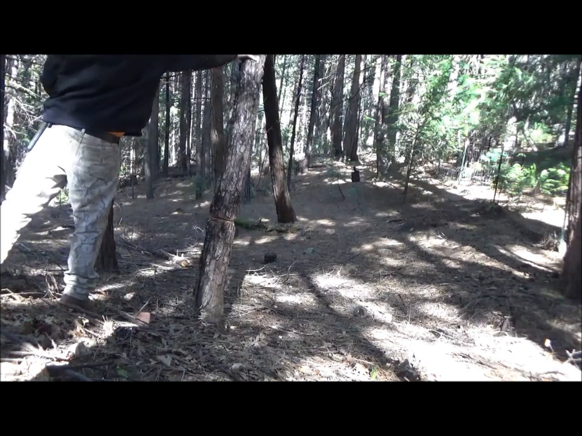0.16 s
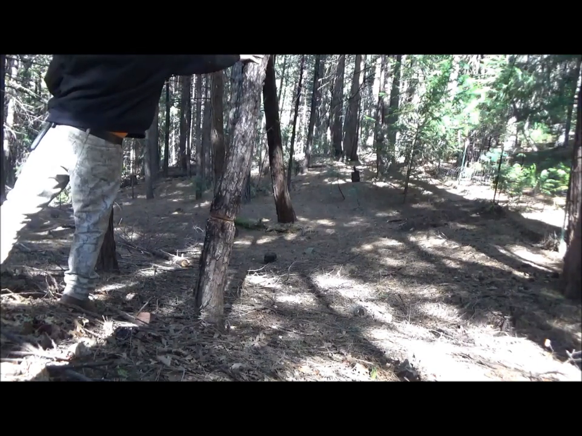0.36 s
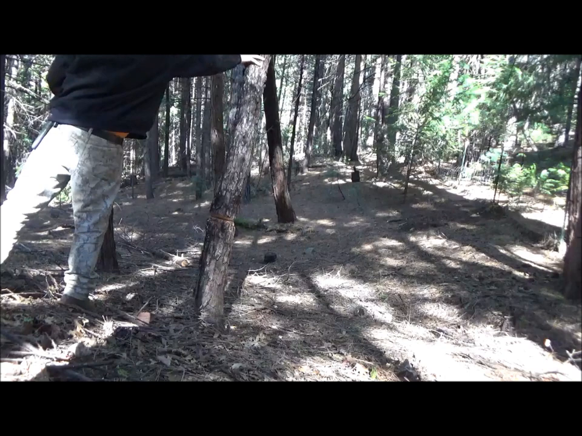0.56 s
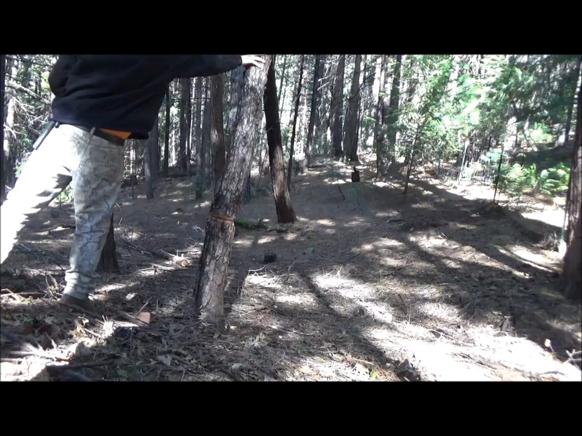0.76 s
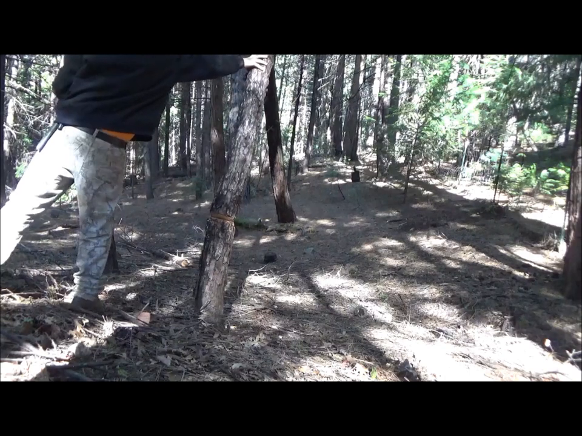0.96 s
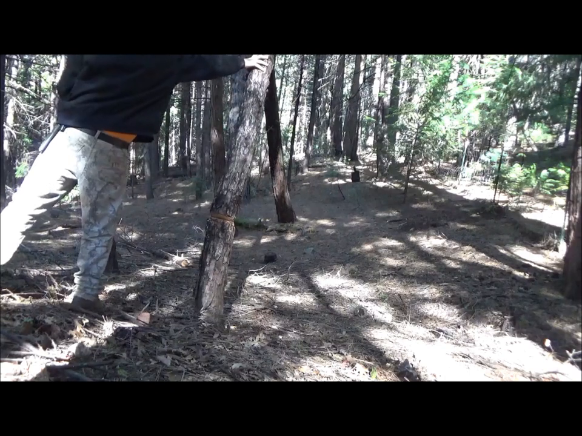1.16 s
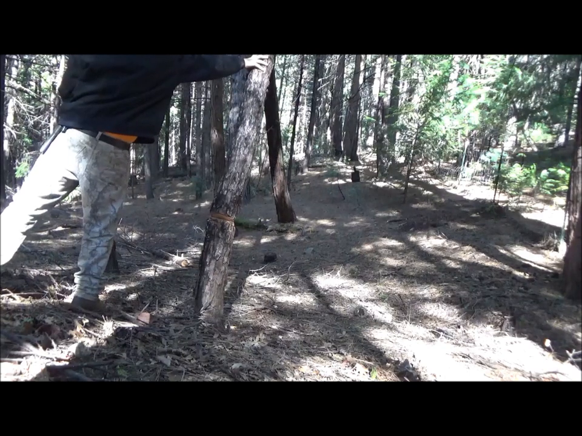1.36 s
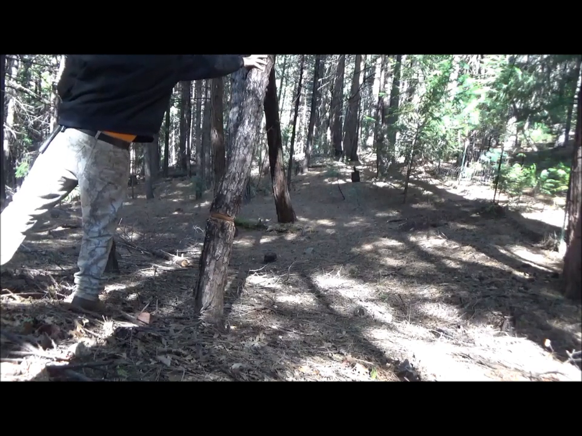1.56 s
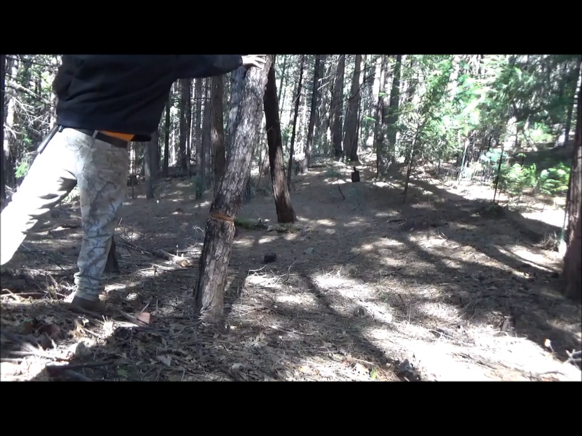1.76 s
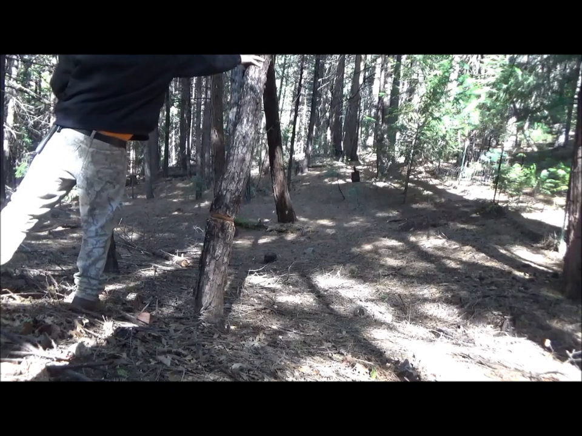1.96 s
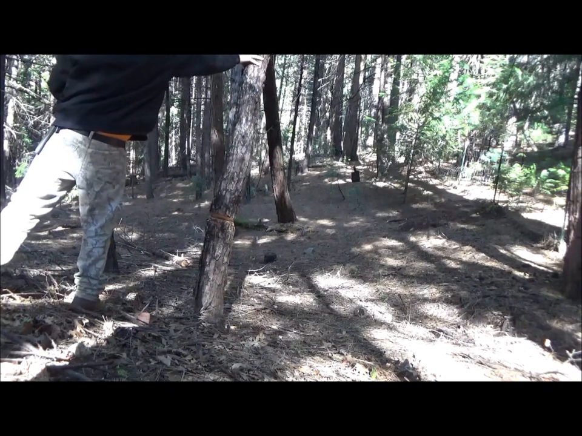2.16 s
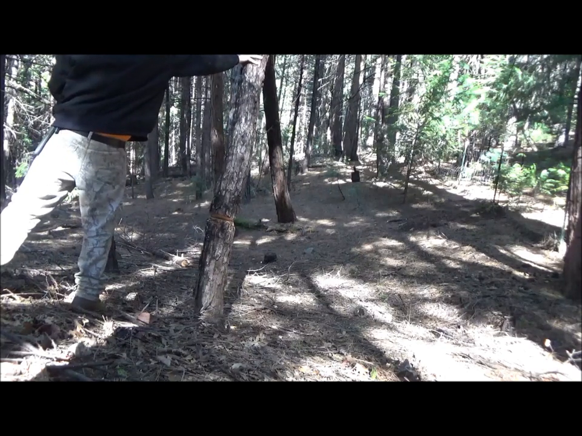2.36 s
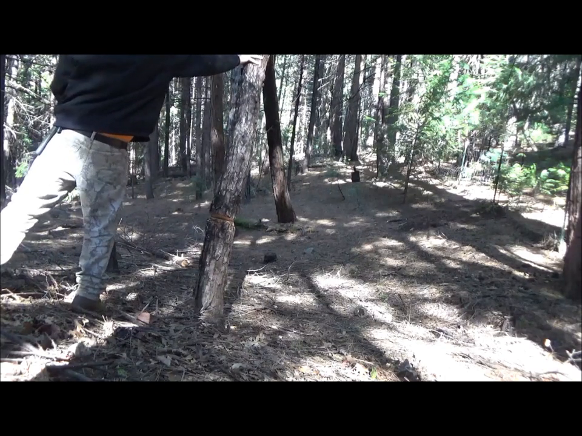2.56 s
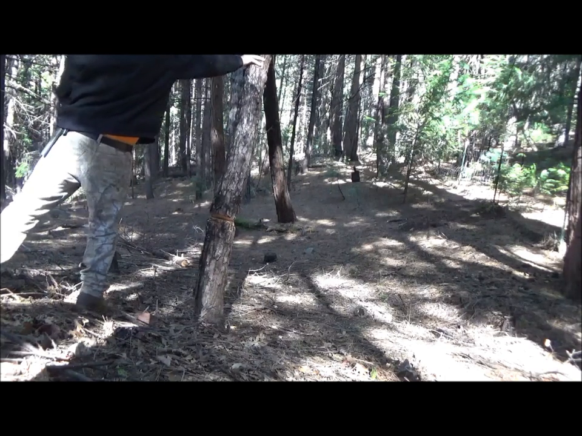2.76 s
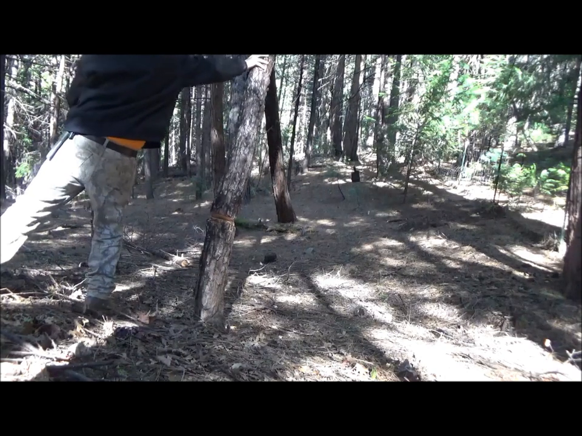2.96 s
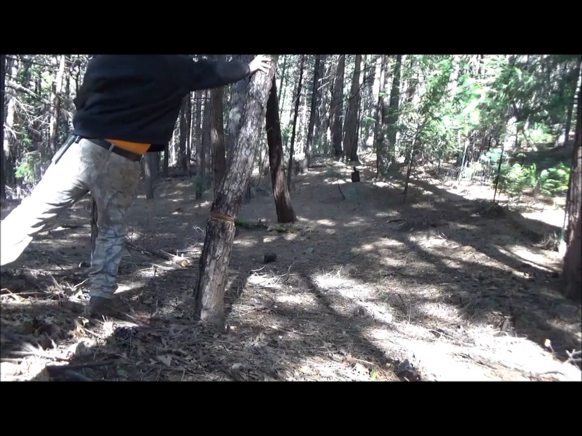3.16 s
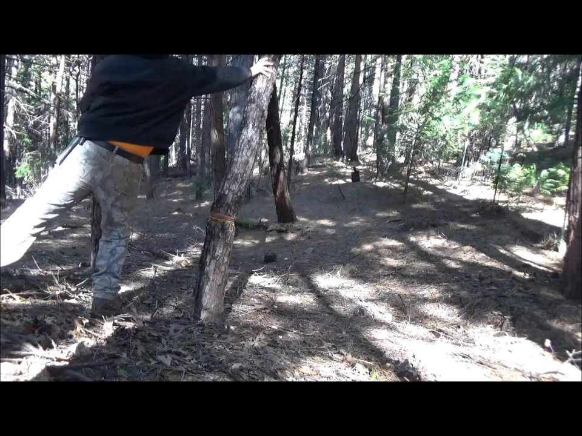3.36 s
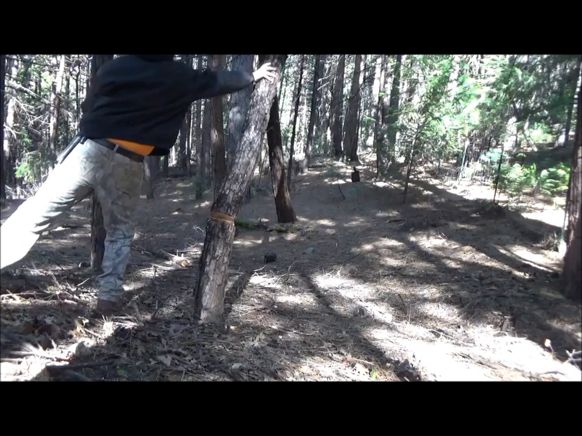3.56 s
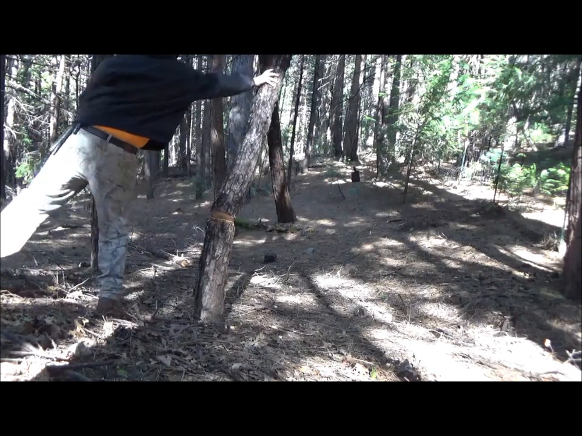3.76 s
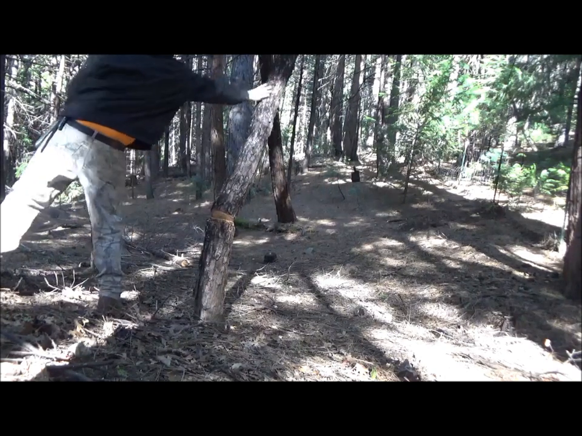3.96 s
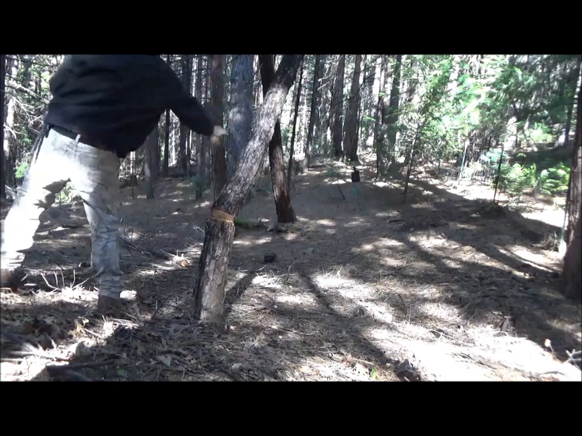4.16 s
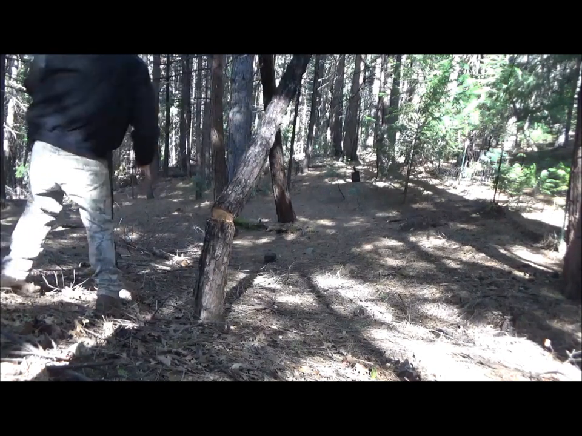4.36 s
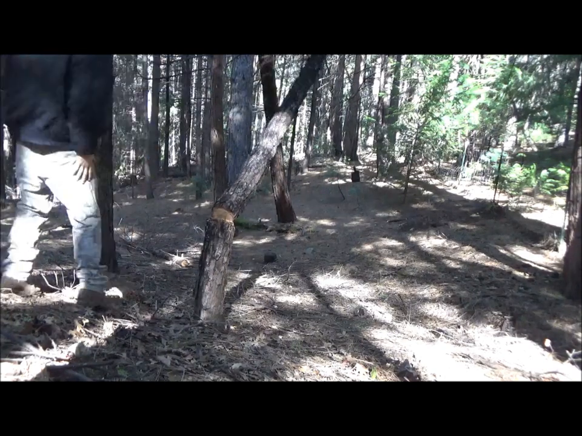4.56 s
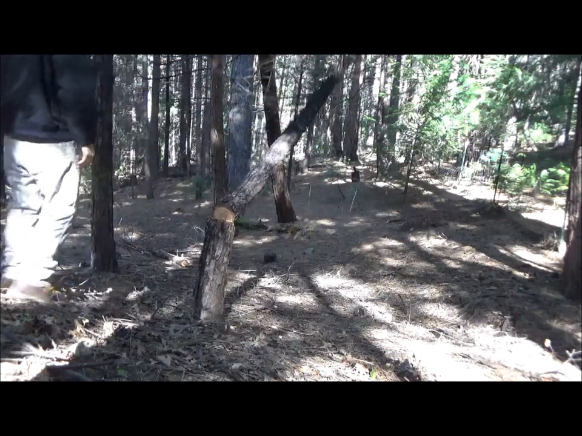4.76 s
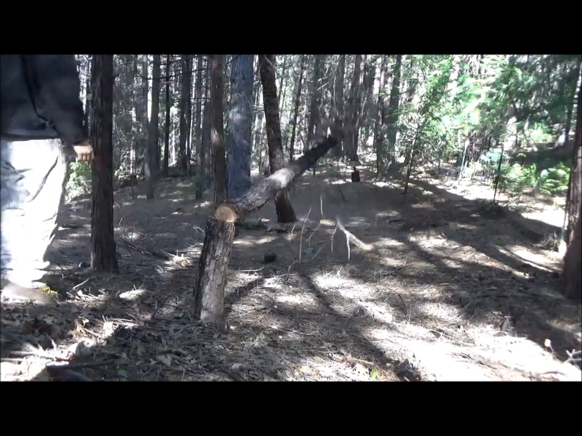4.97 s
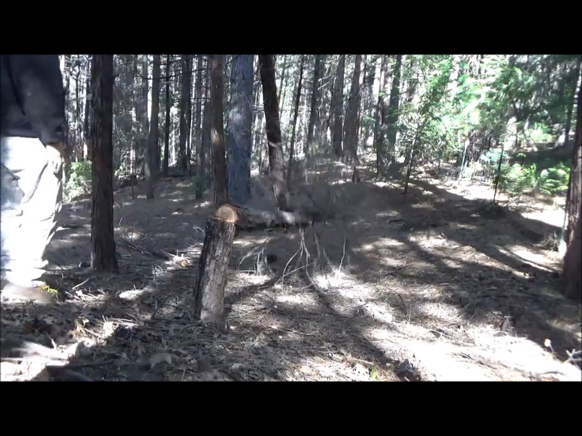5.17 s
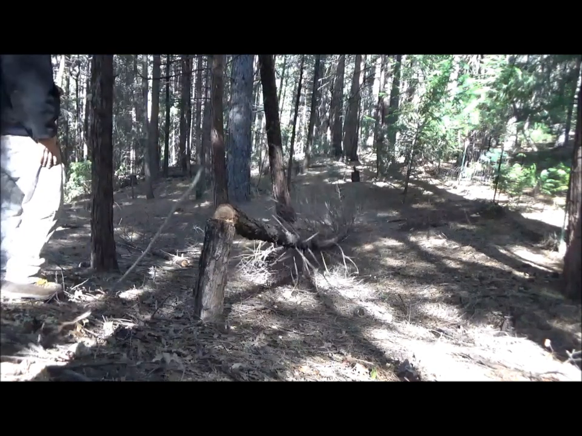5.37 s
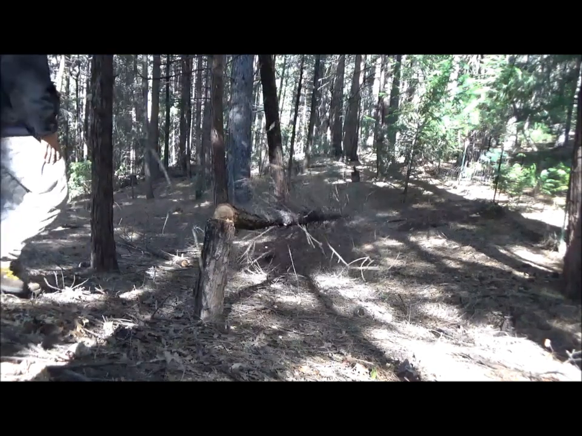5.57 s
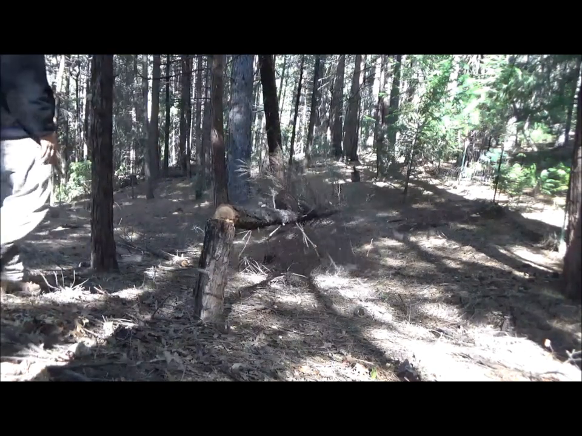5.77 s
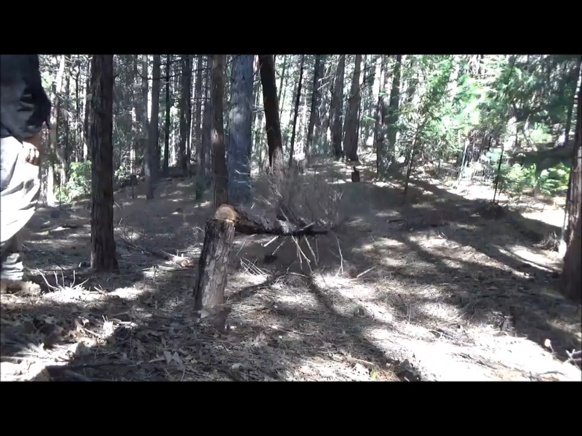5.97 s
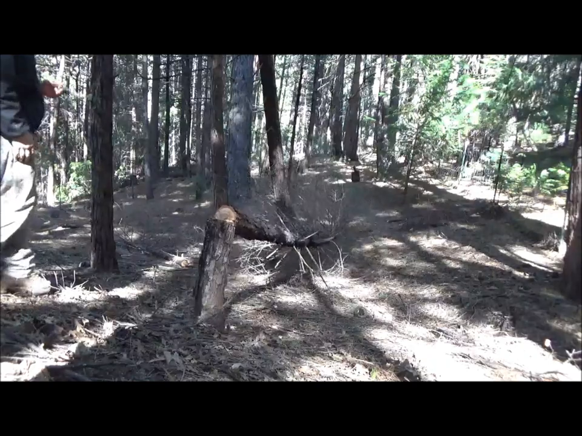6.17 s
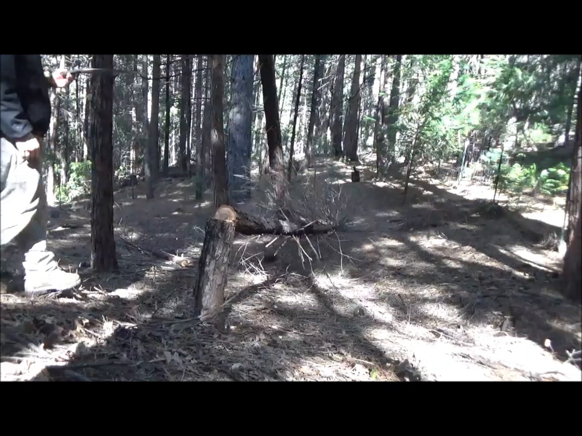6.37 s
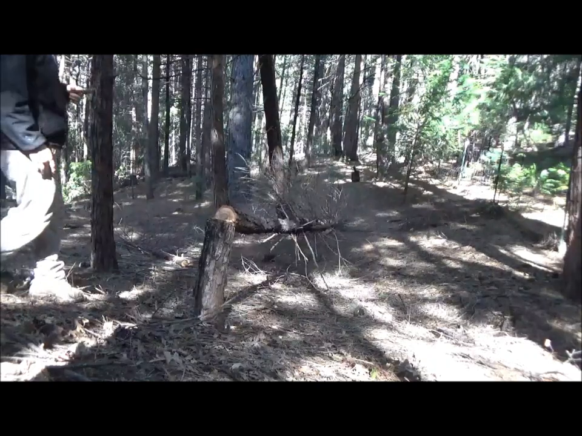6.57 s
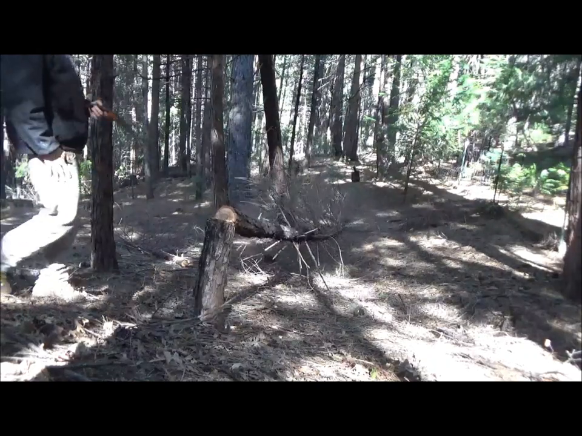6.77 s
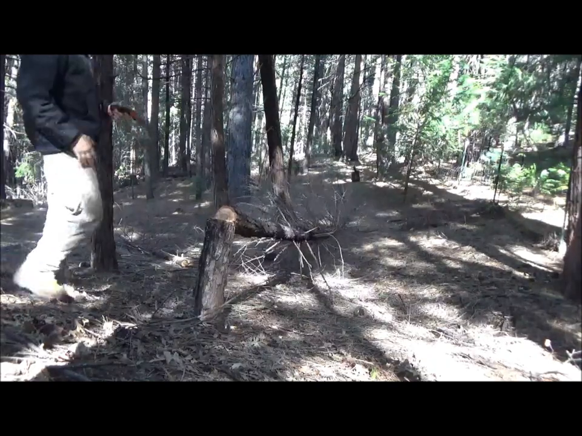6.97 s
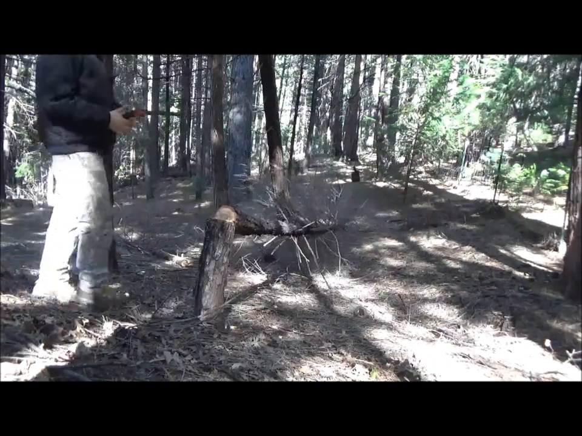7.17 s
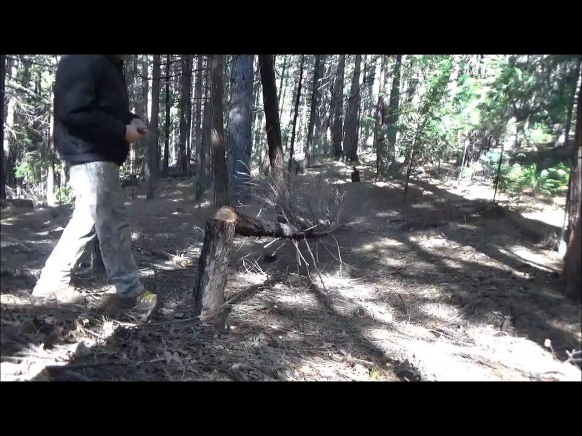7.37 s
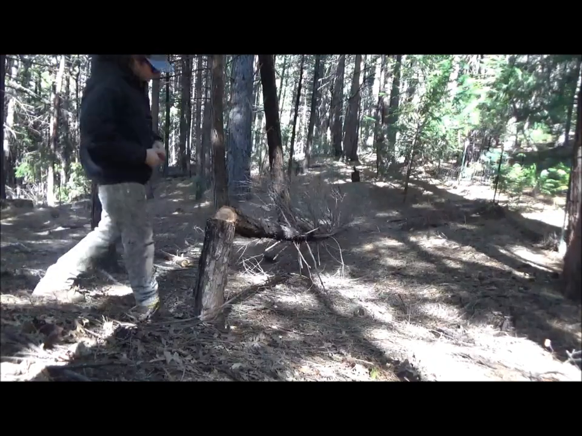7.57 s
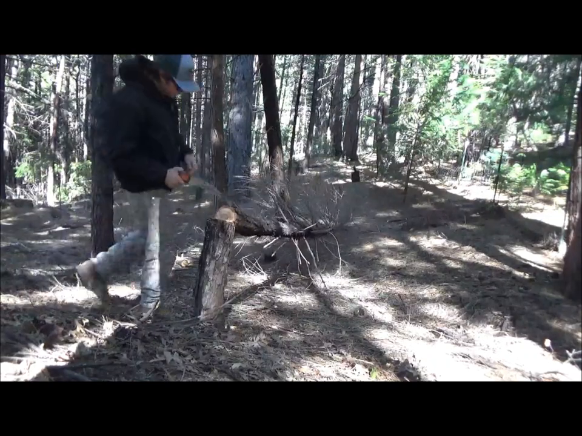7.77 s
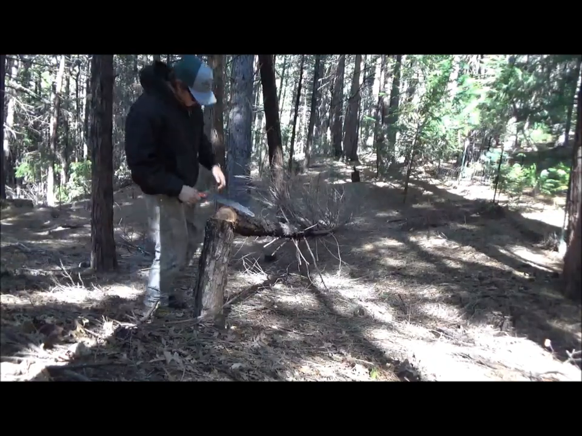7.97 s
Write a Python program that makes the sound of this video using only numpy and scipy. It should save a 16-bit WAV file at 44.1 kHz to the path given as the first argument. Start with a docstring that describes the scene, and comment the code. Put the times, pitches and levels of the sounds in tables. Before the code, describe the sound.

Close outdoor stereo sound in a dry forest. Boots crunch litter with bright snaps in the first second, then sparse faint ticks. Just after three seconds a dead stem tears in dense, sharp cracks, and its brittle crown crashes in a harsh rush until nearly six. Twigs settle and someone steps through them, with very faint distant chirps.

```python
"""A small dead tree is pushed over in a forest. Boots grind in dry litter while the stem cracks fibre by fibre:
crackle is a swarm of damped rings over hollow filtered noise; each crack is a resonant noise burst.
Damped sines make knocks and low thumps. From 3.2 s the stem tears, limbs judder (resonators hit by random slips)
and break, and the brittle crown crashes and settles. Someone walks up through the twigs; faint noise-band chirps
sound. A thin echo follows the wood; a limiter dips the level briefly on the sharpest cracks."""
import sys
import numpy as np
from scipy import signal
from scipy.fft import rfft, irfft, next_fast_len
from scipy.io import wavfile
from scipy.ndimage import uniform_filter1d, minimum_filter1d

SR = 44100
rng = np.random.default_rng(int(sys.argv[2]) if len(sys.argv) > 2 else 0)


def master(y):
    """Save y as 16-bit WAV."""
    cut = np.clip(np.atleast_2d(y).T, -1, 1)
    pcm = np.round(cut * 32767)  # scale
    wavfile.write(sys.argv[1], SR, pcm.astype(np.int16))


N = 354123
TOP_HZ = 11000  # upper band edge


def amp(db):
    """Decibels to gain."""
    return 10 ** (np.asarray(db) / 20)


def unit(x):
    """Scale to rms 1."""
    return x / np.sqrt(np.mean(x ** 2) + 1e-20)


def along(points, hz):
    """Read (f/Hz, value) points on a log-frequency axis."""
    f, v = np.transpose(points)
    return np.interp(np.log(hz + 1), np.log(f), v)


def filtered(x, response):
    """Multiply the spectrum of x by a response of frequency."""
    m = next_fast_len(x.shape[-1] + 4096)
    spectrum = rfft(x, m) * response(np.fft.rfftfreq(m, 1 / SR))
    return irfft(spectrum, m)[..., :x.shape[-1]]


def add(track, s, sound, pan):
    """Mix a sound into a stereo track at time s; pan > 0 is left."""
    part = track[:, round(s * SR):][:, :len(sound)]
    part += np.array([[1 + pan], [1 - pan]]) * sound[:part.shape[1]]


def lumps(depth_db, size):
    """A gain that jumps about in clumps of about size samples."""
    return amp(depth_db * unit(uniform_filter1d(rng.standard_normal(N), size=size)))


def curves(rows):
    """One value per sample for each column after the time."""
    s, *columns = np.transpose(rows)
    return [np.interp(np.arange(N) / SR, s, c) for c in columns]


def swell(start, hold, rise_db_per_s, fall_db_per_s):
    """Attack, hold and release, in dB under the top."""
    t = np.arange(N) / SR
    return -rise_db_per_s * np.maximum(start - t, 0) - fall_db_per_s * np.maximum(t - start - hold, 0)


def powers(shape_db, crackle_db, splinter_db, weight_db):
    """Power that one cause drives into twigs, splinters and hollow body; the last two in dB re crackle."""
    power = amp(np.maximum(shape_db + crackle_db, -150)) ** 2
    return np.array([power, power * amp(splinter_db) ** 2, power * amp(weight_db) ** 2])


def press(start, hold):
    """A boot or a bent stem loads the litter quickly and eases off more slowly."""
    return swell(start, hold, rise_db_per_s=449.5, fall_db_per_s=130)


def litter_stir():
    """The litter stirs faintly and evenly all along."""
    return powers(np.zeros(N), crackle_db=-51.5, splinter_db=-5, weight_db=-6)


def stem_strain():
    """The bent stem grinds at the stump until it gives a little."""
    return powers(press(0, hold=2.6), crackle_db=-55, splinter_db=-11, weight_db=-1)


def boots():
    """Boots crush litter, shoving and later walking; the walker's legs also stir it."""
    # treads: t/s, hold/s, crackle drive/dB, splinter drive/dB re crackle, weight drive/dB re crackle
    tread_rows = [(.135, .04, -42.5, 1, -8), (.24, .03, -31.5, -1.5, -7.5), (.32, .03, -39, 0, -6),
                  (.415, 0.04, -41.5, 7.5, -1.5), (0.519, .13, -31, -1.5, -7.5),
                  (0.699, 0.12, -30.5, 0, -9), (.89, .14, -36, 0.5, -7.5), (1.11, .08, -38, -3, -10),
                  (1.21, .02, -34.5, -5, -12), (1.265, .025, -31, -2, -7), (1.369, 0.16, -45, -10, -12),
                  (1.85, 0.098, -47.5, -10, -6), (2.131, 0.018, -45.5, -14, -7.5),
                  (2.359, .015, -47, -14, -23), (2.73, 0.089, -53, 10, -21), (2.869, .05, -46.5, 10, -8.5),
                  (2.948, .07, -44.5, 6.5, -5), (3.07, .11, -46, -4, -2.5), (5.811, 0.012, -33, -10, -10),
                  (6.118, .03, -40, -4, -9), (6.235, 0.027, -35.5, -9, -20), (6.439, .04, -40.5, -9, -14),
                  (6.69, .02, -39, 2, -24), (6.95, .09, -43.5, -5, -30), (7.15, .2, -45, 0, -5),
                  (7.245, .012, -41, 10.5, -6.5), (7.53, .025, -38.5, 3, -13.5),
                  (7.672, 0.037, -43, 11.5, -5.5), (7.80, 0.1, -44.5, 6.5, -8.5)]
    treads = sum(powers(press(s, hold), *levels_db) for s, hold, *levels_db in tread_rows)
    legs = powers(press(6.75, hold=1.3), crackle_db=-44.5, splinter_db=2.5, weight_db=-11.5)
    return treads + legs


def flurries():
    """One fracture sets off its neighbours: a gain that leaps at random instants and dies at once."""
    rate_per_s, decay_s = 190, 0.0015
    # strength of the flurries: t/s, power of a mean kick re the even crackle
    flurry_power = [(2.8, 2), (3.4, 0.63), (4.5, 0.36), (4.9, 1.1), (5.4, 1.9), (5.9, 1.4), (7.0, 2.4)]
    kicks = (rng.random(N) < rate_per_s / SR) * rng.exponential(size=N)
    dying = signal.lfilter([1], [1, -np.exp(-1 / (decay_s * SR))], kicks)
    return np.sqrt(1 + np.abs(curves(flurry_power)[0]) * dying)


def crackle(colour, clumps, rate, pitch_hz, octaves, cycles, blur, size=64):
    """A stereo swarm of tiny fractures, each a damped ring; rms 1 over any 59 ms or so."""
    count = int(rate * N / SR)
    strength, pitch, life, pan = rng.standard_normal((count, 4)).T[:, :, None]
    start = (rng.random((count, 1)) * N).astype(int)
    hz = np.clip(pitch_hz * 2 ** (octaves * pitch), 100, SR / 3)
    turns = hz * np.arange(size) / SR
    # low, slow rings are weaker, so that all pitches carry like energy
    gain = amp(5.5 * np.minimum(strength, 2.3)) * np.sqrt(hz / pitch_hz)
    decay = np.exp(-turns / (cycles * 2 ** (life / 2)))
    rings = gain * np.sin(2 * np.pi * turns) * decay
    index = (start + np.arange(size)).ravel()
    left, right = [np.bincount(index, (rings * (1 + side * 0.31 * pan)).ravel(), N)[:N] for side in (1, -1)]
    # countless fainter fractures blur into a hiss
    swarm = clumps * (unit(np.array([left, right])) + blur * rng.standard_normal(N))
    swarm = filtered(swarm, lambda f: amp(along(colour, f)))
    power = np.abs(uniform_filter1d(np.mean(swarm ** 2, axis=0), size=2600))
    return swarm / np.sqrt(power + 1e-9)


def patchy(x, depth_db):
    """Different twigs give way in turn, so the colour shifts in patches of about 600 Hz by 40 ms."""
    z = signal.stft(x, nperseg=512)[2]
    field = uniform_filter1d(rng.standard_normal(z.shape[1:]), size=7, axis=0)
    field = uniform_filter1d(field, size=7, axis=1)
    return signal.istft(z * amp(depth_db * unit(field)), nperseg=512)[1][:, :N]


def crunch(colour, rough_db, width, size=400):
    """Dull, lumpy noise of rms 1 from a crushed, damped body."""
    noise = lumps(rough_db, size) * rng.standard_normal((2, N))
    mid, side = filtered(noise, lambda f: amp(along(colour, f)))
    return unit(np.array([mid + width * side, mid - width * side]))


def hollow():
    """Body resonance passes from whole to split stump, to the crown on the ground, then to the litter."""
    # body colour of the stump, at pitch 1: f/Hz, level/dB
    stump_colour = [(25, -49), (90, -30.5), (170, -20.5), (290, -12), (420, -2), (530, 4.5), (680, 2),
                    (850, 0), (1100, -2.5), (1500, -6.5), (3000, -13)]
    # body colour of the ground under the crown: f/Hz, level/dB
    ground_colour = [(25, -48), (90, -30), (170, -16), (270, -6), (420, 1.5), (580, 0.5), (830, -6),
                     (1600, -5.5), (3000, -15.5)]
    # body colour of the litter: f/Hz, level/dB
    litter_colour = [(25, -48), (90, -28), (170, -15.5), (280, -3), (650, 0.5), (950, -2), (1350, -6),
                     (3000, -11.5)]

    def stump(pitch):
        return crunch([(hz * pitch, db) for hz, db in stump_colour], rough_db=2.0, width=0.04)

    stages = [
        stump(pitch=1.01),  # whole
        stump(pitch=0.89),  # split
        crunch(ground_colour, rough_db=3.0, width=0.053),
        crunch(litter_colour, rough_db=2.0, width=0.053),
    ]
    stage = np.interp(np.arange(N) / SR, [3.3, 4.5, 4.8, 5.0, 5.55, 5.8], [0, 1, 1, 2, 2, 3])
    # equal-power crossfades
    return sum(np.sqrt(np.maximum(1 - np.abs(stage - k), 0)) * sound for k, sound in enumerate(stages))


def crushing(force_db, fine_db, load_db):
    """Twigs and splinters crackle over a hollow crunch, each at its own driven level."""
    # twig colour: f/Hz, level/dB
    twig_colour = [(300, -53), (900, -7), (1300, -2.5), (2000, 0), (3000, 1.5), (4500, 4.5), (6500, 7.5),
                   (8000, 8), (11000, 0)]
    # splinter colour: f/Hz, level/dB
    splinter_colour = [(3000, -23), (5500, -22), (7500, -3.5), (9000, 9), (10300, 9.5), (11000, 3)]
    # soil colour: f/Hz, level/dB
    soil_colour = [(25, -17), (70, -2), (160, 6.5), (300, 17), (600, -42), (1500, -70)]
    clumps = flurries()
    twigs = crackle(twig_colour, clumps, rate=2800, pitch_hz=4490, octaves=0.94, cycles=0.46, blur=1.55)
    twigs = patchy(twigs, depth_db=1.29)
    splinters = crackle(splinter_colour, clumps, rate=1300, pitch_hz=9300, octaves=0.65, cycles=1.6, blur=1.5)
    # the soil takes the weight in uneven bumps
    body = hollow() + amp(-26.0) * crunch(soil_colour, rough_db=8.0, width=0.21, size=1300)
    # wood gives way in fits and starts
    fits = lumps(depth_db=0.75, size=2000)
    return fits * (amp(force_db + 0.9) * twigs + amp(fine_db - 3.0) * splinters + amp(load_db + 2.0) * body)


def cracks(rows, broad_db=-17, scatter_db=-28, scatter_t60=0.12, ragged_db=2.1):
    """Each break is a short burst in the splinter's own resonance; the litter around scatters it."""
    track, t = np.zeros((2, N)), np.arange(4096) / SR
    for s, db, hz, t60, q in rows:
        hz, q = min(hz, TOP_HZ), max(q, 1)
        burst, scatter = rng.standard_normal((2, len(t)))
        # the fibres fail in quick succession, so the burst stutters
        burst = burst * amp(ragged_db * unit(uniform_filter1d(rng.standard_normal(len(t)), size=44)))
        burst = burst * amp(-60 * t / max(t60, .001))
        burst = burst + amp(scatter_db) * scatter * amp(-60 * t / scatter_t60)
        # a ragged break spreads over all frequencies, a clean one rings
        snap = signal.lfilter(*signal.iirpeak(hz, q, SR), burst) + amp(broad_db) / q * burst
        # thin wood radiates little bass
        snap = signal.lfilter(*signal.butter(1, hz * q / (q + 12), "high", fs=SR), snap)
        snap = filtered(snap, lambda f: f < TOP_HZ)
        add(track, s, amp(db) * snap / np.abs(snap).max(), pan=0.12 * rng.standard_normal())
    return track


def parted():
    """0 while the stem hangs on the stump, 1 once it is off."""
    middle_s, length_s = 4.62, 0.66
    return np.clip(.5 + (np.arange(N) / SR - middle_s) / length_s, 0, 1)


def lesser_snaps(force_db, spread_db=3, octaves=0.34, count=130):
    """Rows for cracks(): the harder the crushing, the more often and the louder a twig gives way."""
    doubling_db = 11.5  # crackle drive that doubles the rate
    crash_db, snap_db, db_per_db = -24, -14.5, 1  # reference drive, mid stem-snap peak there, growth
    stem_hz, crown_hz = 7700, 9900  # mid pitches; crown twigs are thinner than stem fibres
    crown_extra_db = 1.5  # brittle twigs snap harder
    mid_t60_s, mid_q = 0.01, 6.9
    chance = np.cumsum(2 ** (force_db / doubling_db))
    at = np.searchsorted(chance, chance[-1] * (np.arange(count) + rng.random(count)) / count)
    strength, pitch, life, ring = rng.uniform(-1, 1, (count, 4)).T
    off = parted()[at]
    db = snap_db + db_per_db * (force_db[at] - crash_db) + spread_db * strength + crown_extra_db * off
    hz = (stem_hz + off * (crown_hz - stem_hz)) * 2 ** (octaves * pitch)
    return np.column_stack([at / SR, db, hz, mid_t60_s * 2 ** life, mid_q * 2 ** ring])


def forest(x, count=25):
    """Trunks return a thin, diffuse echo, different at each ear and redrawn for each of count stretches."""
    # echo decay: f/Hz, t60/s
    echo_t60 = [(200, 0.055), (1500, 0.17), (5000, 0.065), (11000, 0.058)]
    echo, edges = np.zeros((2, N)), np.linspace(0, N, count + 1).astype(int)
    for a, b in zip(edges, edges[1:]):
        hz, t, z = signal.stft(rng.standard_normal((2, SR // 2)), SR, nperseg=256)
        tail = signal.istft(z * amp(-60 * t / along(echo_t60, hz)[:, None]), SR, nperseg=256)[1]
        part = signal.fftconvolve(x[:, a:b], tail / np.linalg.norm(tail[0]), axes=1)[:, :N - a]
        echo[:, a:a + part.shape[1]] += part
    return echo


def knocks(attack_s=0.00057):
    """Thick wood meets soil or boot and rings for a few cycles."""
    # blunt knocks: t/s, level before attack and high-pass/dB, f/Hz, t60/s
    knock_rows = [(.549, -26.5, 567, .05), (2.123, -33, 580, 0.034), (2.146, -32.5, 880, 0.033),
                  (3.236, -16, 810, 0.012), (3.253, -26, 550, 0.047), (3.668, -28, 346, .045),
                  (3.681, -43, 237, 0.082), (4.24, -32, 340, .035), (4.43, -40.5, 210, 0.054),
                  (5.353, -16.5, 557, 0.012), (5.393, -19, 520, 0.014), (5.454, -40.5, 192, 0.079),
                  (6.343, -41.5, 297, 0.087), (6.666, -16.5, 730, 0.016), (6.705, -25, 690, 0.013)]
    track, t = np.zeros((2, N)), np.arange(SR // 10) / SR
    for s, db, hz, t60 in knock_rows:
        ring = amp(db - 60 * t / t60) * np.sin(2 * np.pi * hz * t) * (1 - np.exp(-t / attack_s))
        # a small body radiates little below its own pitch
        ring = signal.lfilter(*signal.butter(3, hz * 0.6, "high", fs=SR), ring)
        add(track, s, ring, pan=.05)
    return track


def thumps():
    """Short, low thumps, mostly under loud cracks, each a damped sine."""
    # thumps: t of the peak/s, peak level/dB
    thump_rows = [(.764, -59), (3.425, -57), (3.719, -58), (4.059, -56), (4.137, -53), (4.243, -47),
                  (4.469, -52), (4.816, -52), (5.082, -51), (5.354, -49), (5.457, -61)]
    hz, t60_s = 86, .04
    track, t = np.zeros((2, N)), np.arange(SR // 8) / SR
    thump = amp(-60 * t / t60_s) * np.sin(2 * np.pi * hz * t)
    for s, db in thump_rows:
        add(track, s - t[thump.argmax()], amp(db) * thump / thump.max(), pan=0)
    return track


def tree():
    """The stem tears; once parted the crown takes over, shatters its finest twigs on landing, and settles."""
    # tearing and crash: t/s, force/dB
    fall_force = [(3.2, -42), (3.26, -31), (3.4, -29.5), (3.48, -26), (3.64, -25.5), (3.719, -28),
                  (4.03, -27), (4.1, -23.5), (4.24, -24), (4.258, -29.5), (4.559, -28.5), (4.729, -30),
                  (4.93, -28.5), (5.069, -26.5), (5.09, -30.5), (5.3, -27.5), (5.451, -26), (5.47, -29),
                  (5.6, -30), (5.72, -37)]
    edge_db_per_s = 348
    tear_splinter_db, crown_splinter_db, landing_splinter_db = -3, 0, 9
    tear_weight_db, crown_weight_db, landing_weight_db = -10, -17, 2.5
    landing_s, landing_width_s = 5.34, 0.18
    start, end = fall_force[0][0], fall_force[-1][0]
    force_db = curves(fall_force)[0] + swell(start, end - start, edge_db_per_s, edge_db_per_s)
    off = parted()
    landing = np.exp(-((np.arange(N) / SR - landing_s) / landing_width_s) ** 2)
    splinter_db = (1 - off) * tear_splinter_db + off * crown_splinter_db + landing * landing_splinter_db
    weight_db = (1 - off) * tear_weight_db + off * crown_weight_db + landing * landing_weight_db
    falling = powers(force_db, 2, splinter_db, weight_db)
    settle_shape_db = swell(5.75, hold=.4, rise_db_per_s=17.5, fall_db_per_s=17.5)
    settling = powers(settle_shape_db, crackle_db=-36, splinter_db=5.5, weight_db=-12.5)
    return falling + settling


def limbs(slips_per_s=900):
    """Uneven slips ring the loaded limbs; the sound swells and stops dead when they break."""
    # limb resonances: f/Hz, width/Hz, level/dB
    limb_modes = [(1580, 500, -1), (2140, 180, -1), (2950, 320, 2.5)]

    def response(f):
        total = 0
        for k, (hz, width_hz, db) in enumerate(limb_modes):
            damping = 1j * f * width_hz
            total = total + (-1) ** k * amp(db) * damping / (hz * hz - f * f + damping)
        return total

    slips = (rng.random(N) < slips_per_s / SR) * rng.standard_normal(N)
    break_s, break_db = 5.072, -31
    level_db = break_db + swell(break_s, hold=0, rise_db_per_s=42, fall_db_per_s=1200)
    return unit(filtered(slips, response)) * amp(level_db)


def chirps():
    """Faint far chirps, perhaps a bird: narrow bands of noise under smooth fades."""
    # chirps: t/s, length/s, f/Hz, rms level before the fades/dB
    chirp_rows = [(6.985, 0.032, 4600, -45), (7.02, 0.028, 4130, -44), (7.787, 0.079, 2800, -44.5)]
    width_hz = 300
    track = np.zeros((2, N))
    for s, length, hz, db in chirp_rows:
        tone = filtered(rng.standard_normal(SR // 4), lambda f: np.exp(-((f - hz) / width_hz) ** 2))
        note = unit(tone)[:round(length * SR)]
        add(track, s, amp(db) * note * np.hanning(len(note)), pan=0)
    return track


def scene():
    """All the breaking wood, with the forest's echo and its distant chirps."""
    # cracks that stand out: t/s, peak level/dB, f/Hz (held to TOP_HZ), t60/s, resonance Q (at least 1)
    crack_rows = [(.0235, -26.5, 8600, 0.013, 3), (.133, -21, 6640, 0.014, 3.2),
                  (.1995, -13, 6500, 0.0073, 1.7), (.2015, -7.5, 5550, 0.024, 1.4),
                  (.243, -14.5, 7000, .003, 2.2), (.2509, -14, 7400, 0.027, 1.5),
                  (.4412, -17.5, 6500, 0.021, 1.2), (.49, -23, 6500, .01, 2.4),
                  (.5035, -11.5, 6000, 0.013, 0.95), (.507, -13.5, 4000, .022, 0.99),
                  (.5222, -22, 6500, .012, 4.3), (.55, -16.5, 4970, 0.013, 1),
                  (.6008, -21, 7200, 0.011, 3.7), (.6057, -10, 7200, .012, 9.3),
                  (.639, -6.5, 6200, 0.0096, 2.9), (.7076, -19, 6800, 0.005, 2),
                  (.725, -22, 6900, .018, 1.3), (.7637, -0.5, 7500, 0.0058, 1.2),
                  (.7693, -0.5, 9700, 0.0039, 2.8), (.813, -16, 5950, .018, 1.1),
                  (.8773, -24, 5500, .012, 2.4), (.939, -18, 7300, .015, 2), (1.0312, -25, 5900, .012, 1.7),
                  (1.041, -15, 9100, .008, 6.8), (1.1023, -14.5, 6600, .006, 1.4),
                  (1.121, -16, 5600, 0.0087, 0.88), (1.2135, -17.5, 7100, 0.033, 1.6),
                  (1.4482, -27, 5570, .008, 2.4), (1.559, -25.5, 7500, .009, 2.7),
                  (1.6565, -29.5, 8100, 0.012, 2), (1.8454, -10.5, 8700, 0.011, 2),
                  (1.851, -16.5, 8500, .012, 2), (1.9098, -20, 6900, .007, 1.3),
                  (1.9339, -23.5, 7300, .01, 1.3), (2.1234, -29, 4800, .016, 1),
                  (2.145, -18, 5600, 0.016, 1), (2.2075, -10, 8600, 0.013, 6.4),
                  (2.2175, -23, 8800, .007, 5), (2.2909, -24, 6000, 0.016, 2),
                  (2.304, -27, 4500, .014, 1.3), (2.3514, -26, 6300, .012, 3.1),
                  (2.3605, -29, 6500, .01, 4.4), (2.3732, -25.5, 6200, .012, 1.1),
                  (2.3906, -24.5, 8200, 0.009, 3.5), (2.429, -29, 4800, 0.017, 1.4),
                  (2.468, -36, 8000, .009, 2.2), (2.5708, -22, 7500, 0.026, 1.8),
                  (2.757, -16, 9500, .012, 4.9), (2.8648, -21.5, 8700, 0.004, 3.8),
                  (2.9475, -22, 4200, 0.0084, 0.86), (3.0135, -13.5, 9700, 0.012, 1.5),
                  (3.032, -18, 9300, 0.0078, 3.5), (3.188, -13, 6900, 0.012, 1.4),
                  (3.2455, -8.5, 6300, 0.011, 7.4), (3.3045, -3, 6450, 0.0069, 6.3),
                  (3.313, -13, 7600, .002, 3), (3.329, -6, 4600, 0.029, 1.2), (3.385, -15, 8000, .018, 2.5),
                  (3.4431, -9.5, 6400, 0.014, 6.5), (3.602, -8.5, 6400, 0.022, 3.3),
                  (3.632, -9, 5500, 0.017, 1.4), (3.655, -11, 6300, .008, 3.3),
                  (3.6928, -7.5, 5840, 0.014, 5.3), (3.7055, -7.5, 6450, .016, 3.9),
                  (3.718, -1, 8240, 0.0025, 2.4), (3.7848, -7, 8600, .003, 2.9),
                  (3.9274, -1, 8850, .002, 2.6), (3.9886, -12, 6400, .008, 1.8),
                  (4.02, -10, 5500, .04, 1.5), (4.076, -2, 7600, 0.0023, 9.1),
                  (4.093, -6.5, 5500, 0.041, 1), (4.1389, -4, 8000, 0.0035, 2.7),
                  (4.2497, 0, 9700, 0.0041, 6.2), (4.4841, -9.5, 9100, 0.0022, 4.8),
                  (4.6315, -9, 7400, .006, 2), (4.6812, -9, 8100, .003, 1.8), (4.6875, -7, 8400, 0.0028, 3),
                  (4.6935, -7.5, 3800, 0.022, 0.83), (4.719, -2, 6600, .005, 0.99),
                  (4.7419, -8, 9100, 0.0033, 4.5), (4.8168, -0.5, 9600, 0.0022, 5.3),
                  (4.841, -9.5, 8560, 0.0036, 3.8), (4.8478, -9, 8500, .003, 3),
                  (4.8827, -12, 8600, 0.0018, 3.3), (4.8874, -4, 8900, 0.0021, 3),
                  (4.9158, -2, 6700, 0.0036, 1.5), (4.9287, -4, 8700, 0.0043, 3),
                  (4.939, -7, 8900, 0.012, 7), (5.0275, -11, 6860, 0.0092, 4), (5.038, -5, 6860, .018, 3),
                  (5.0797, -1, 6000, 0.005, 1.4), (5.0976, 0, 9050, 0.0034, 4.8),
                  (5.112, -9, 5540, 0.0072, 2.2), (5.1156, -8, 5000, 0.0073, 3),
                  (5.1302, -8, 9050, .003, 3.6), (5.14, -9, 7000, .014, 1.8),
                  (5.1628, -6.5, 8100, .005, 1.3), (5.2018, -10, 6550, 0.006, 2),
                  (5.2496, -2, 9500, 0.0087, 4.4), (5.266, -10, 6000, .012, 1.2),
                  (5.291, -6, 8100, 0.008, 1.3), (5.303, -8, 6500, 0.0093, 1.3),
                  (5.3133, -3, 7000, 0.0054, 2), (5.318, -7, 8000, 0.0045, 2),
                  (5.3295, -8, 9200, 0.014, 2.2), (5.357, -6, 9100, 0.0048, 2),
                  (5.3988, -5.5, 8000, 0.0027, 1.7), (5.4606, 1, 7800, 0.005, 1.7),
                  (5.473, -3, 9100, 0.0032, 4), (5.5492, -15, 3430, 0.029, 8.9),
                  (5.605, -9.5, 8800, .02, 3), (5.649, -9.5, 9050, 0.0098, 3.4),
                  (5.696, -14.5, 7800, .006, 4.9), (5.7627, -14, 8200, 0.009, 4.6),
                  (5.81, -16.5, 4200, 0.043, 0.68), (5.877, -20, 5500, .022, 0.92),
                  (6.0275, -10, 10700, .01, 13), (6.081, -9, 10200, .0068, 7), (6.1925, -16, 9200, .005, 4),
                  (6.2145, -16, 8850, .003, 2.5), (6.238, -15, 8800, 0.0067, 3.7),
                  (6.257, -22, 4500, .022, 1.3), (6.353, -18, 8300, .007, 3), (6.559, -21, 7400, .008, 2),
                  (6.6536, -20, 7800, 0.01, 1.7), (6.699, -19.5, 6000, 0.031, 0.84),
                  (6.842, -23, 5500, 0.018, 2.3), (6.9032, -19, 9000, 0.012, 1.8),
                  (6.943, -25, 7500, .009, 1.8), (6.986, -24, 8000, .01, 2.2),
                  (7.1225, -21, 7900, 0.0098, 1.3), (7.2585, -15, 9350, .006, 7.5),
                  (7.3137, -10, 9000, 0.0092, 27), (7.369, -17, 9500, .008, 7.1),
                  (7.4159, -17, 9200, 0.0059, 6.5), (7.5472, -13, 9100, 0.0022, 6.6),
                  (7.573, -28, 8000, .01, 2.5), (7.638, -15, 9200, 0.0052, 14),
                  (7.792, -21, 8900, .009, 6.2)]
    drive = litter_stir() + stem_strain() + boots() + tree()
    force_db, fine_db, load_db = 10 * np.log10(drive)
    wood = crushing(force_db, fine_db, load_db)
    wood = wood + cracks([*crack_rows, *lesser_snaps(force_db)])
    wood = wood + knocks() + thumps() + limbs()
    return wood + amp(-10.0) * forest(wood) + chirps()


def record(dry):
    """A limiter grabs at once and lets go within about 15 ms; the top treble is cut."""
    ceiling_db = -10  # short-term rms
    level = np.sqrt(np.abs(uniform_filter1d(np.mean(dry ** 2, axis=0), size=13)))
    needed = np.minimum(1, amp(ceiling_db) / (level + 1e-9))
    held = minimum_filter1d(needed, size=441, origin=215)  # holds for about 10 ms
    recovery = signal.lfilter([1 / 220], [1, 1 / 220 - 1], held - 1) + 1  # 5 ms time constant
    gain = uniform_filter1d(np.minimum(held, recovery), size=9)
    return filtered(dry * gain, lambda hz: amp(np.interp(hz - TOP_HZ, [0, 250, 1200, 2500], [0, -25, -58, -100])))


dry = scene()
out = record(dry)
master(out)
```